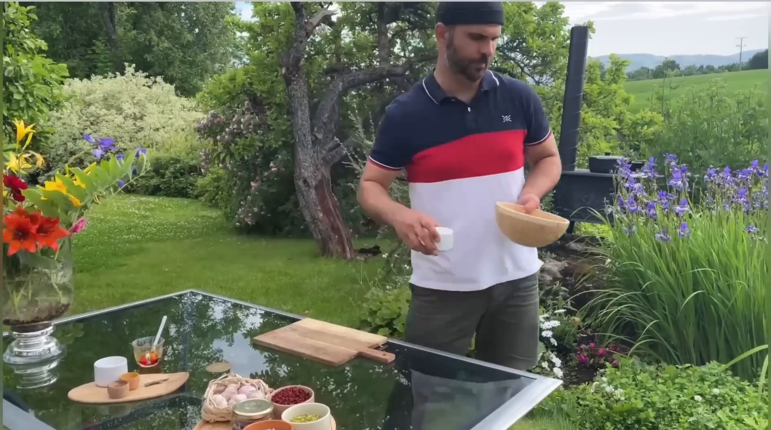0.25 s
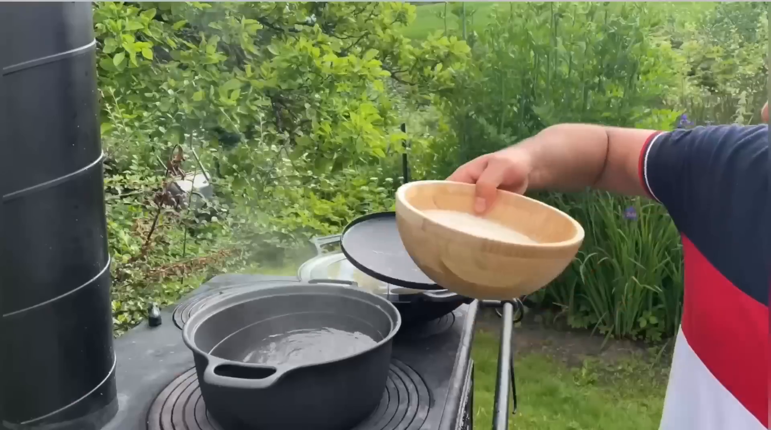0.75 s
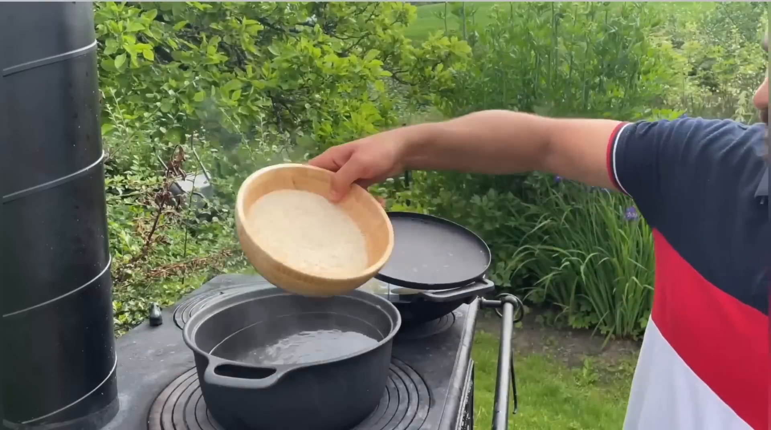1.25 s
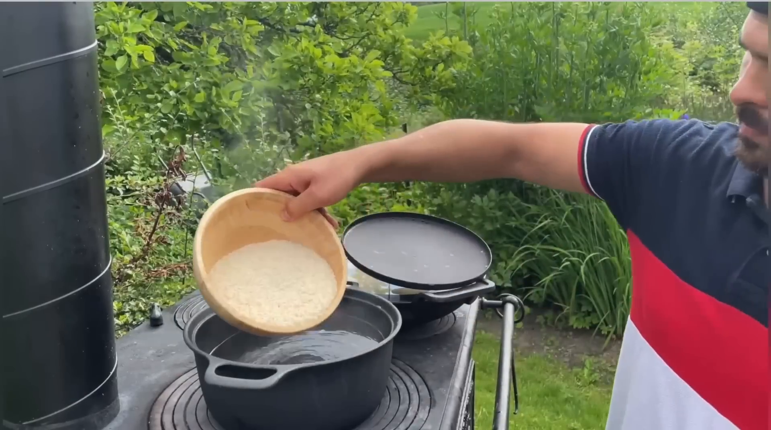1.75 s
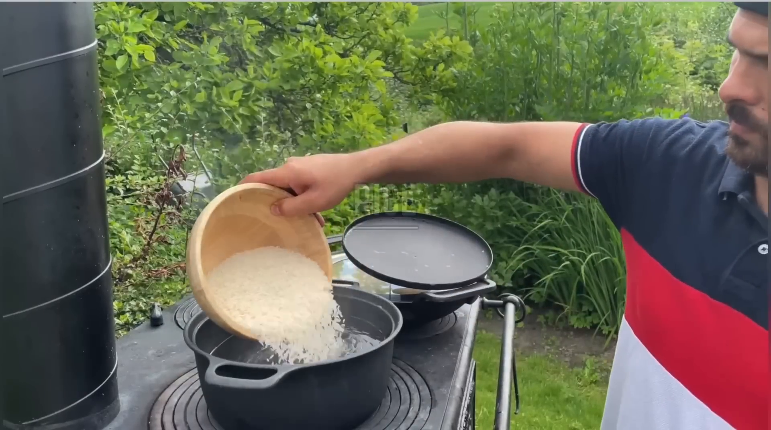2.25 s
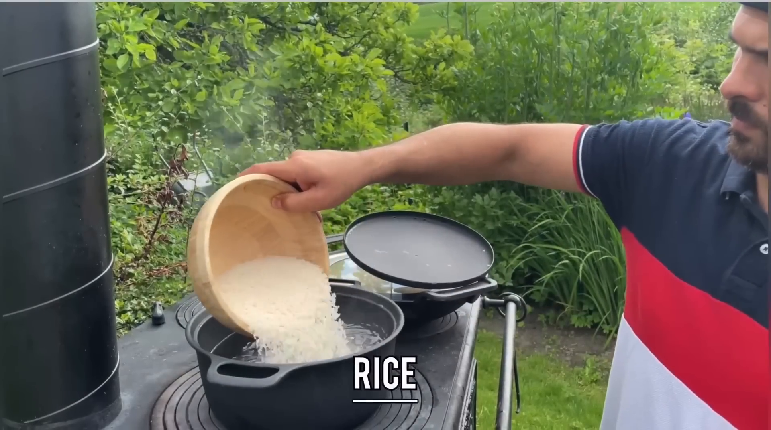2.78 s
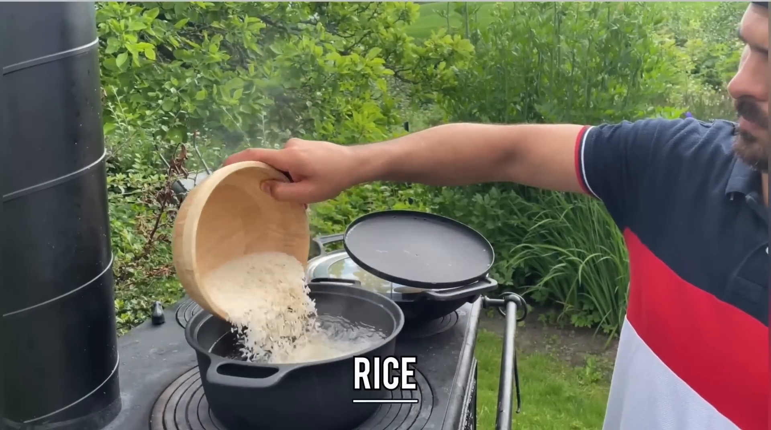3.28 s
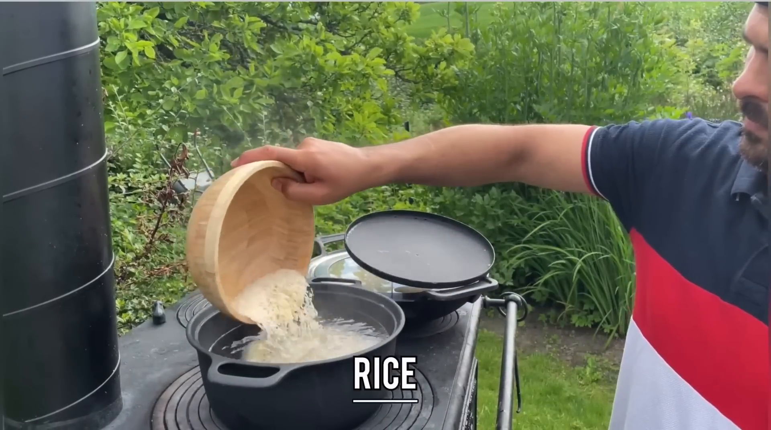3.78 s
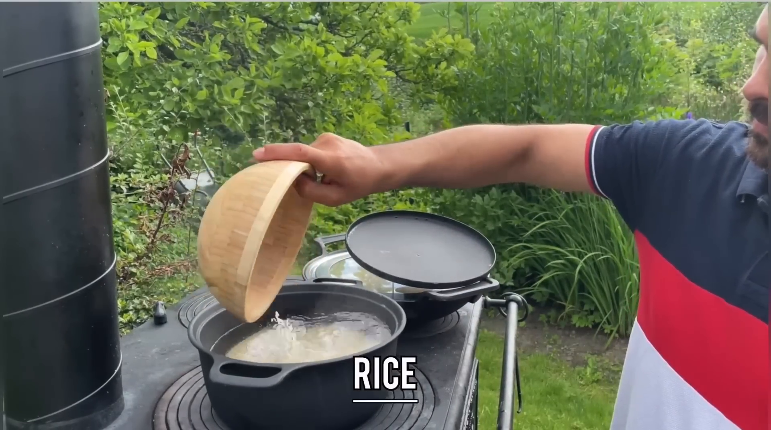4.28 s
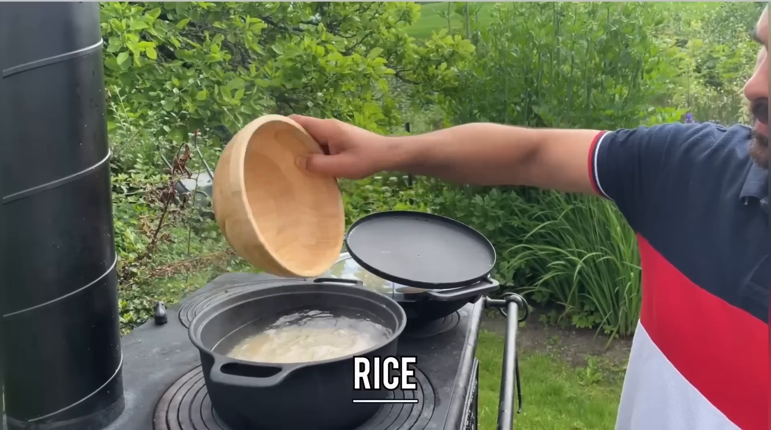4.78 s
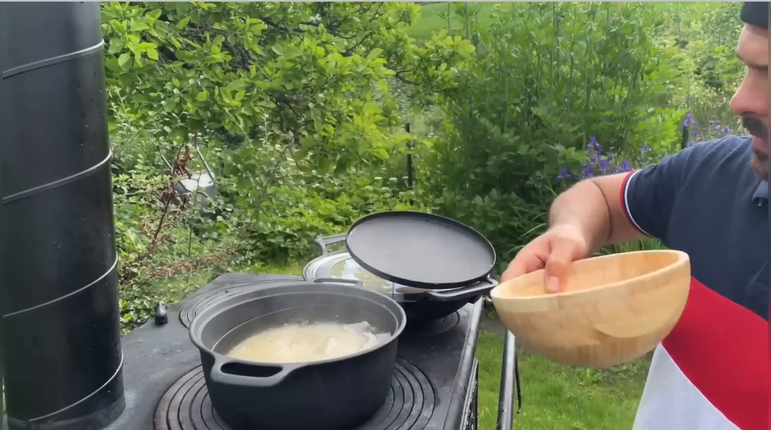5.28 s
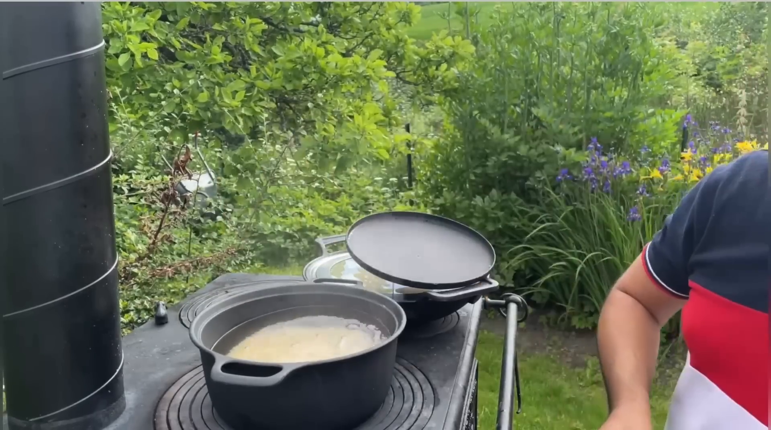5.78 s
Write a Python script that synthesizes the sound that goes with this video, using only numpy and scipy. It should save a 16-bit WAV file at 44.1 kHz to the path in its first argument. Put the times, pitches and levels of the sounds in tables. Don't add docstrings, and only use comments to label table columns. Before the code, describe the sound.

A quiet outdoor garden, stereo microphone, with a muted low hum of a distant road. For the first 0.6 seconds there is little else but a faint rustle near 0.3; then the place changes to a stove and the hum loses some hiss. Soft, deep wind thumps begin around 0.9 and recur, thickest from 3 to 5. At 1.35 a brief, clear slide of dry rice rasps down a wooden bowl. From 1.9 grains trickle, then stream into hot water: a dense crisp hiss of tiny woody clicks with bright fizz, slipping in pulses, thinning near 2.6 and 3.8, fullest about 3.5 and 4.0, stopping by 4.3. Faint fizz from the pot stays, with stray ticks at 4.55 to 5.3 and small rustles at 5.6. At 5.87 the empty bowl hits a table: a sudden, loud, hard wooden clack of near-simultaneous contacts, a small rebound and a very short tail.

```python
import sys
import numpy as np
from scipy import signal
from scipy.fft import rfft, irfft, next_fast_len
from scipy.io import wavfile
from scipy.ndimage import uniform_filter1d

SR = 44100
rng = np.random.default_rng(int(sys.argv[2]) if len(sys.argv) > 2 else 0)


def master_out(mix):
    frames = np.transpose(np.atleast_2d(mix))
    ceiling = np.clip(frames, -1, 1)
    pcm = np.round(ceiling * 32767).astype(np.int16)
    wavfile.write(sys.argv[1], SR, pcm)


def ratio_of_db(decibels):
    return 10 ** (np.asarray(decibels, float) / 20)


N = 266260
MOVE_S = .64

# t/s, flow/dB
POUR = [
    (1.885, -87),
    (1.909, -69.5),
    (2.352, -60),
    (2.61, -65),
    (2.8, -58),
    (3.55, -56),
    (3.8, -62),
    (4.03, -56),
    (4.33, -80),
]


def evened(x):
    return x / np.sqrt(np.mean(x ** 2) + 1e-20)


def read(points, hz, axis=1):
    table = np.transpose(points)
    return np.interp(np.log(hz + 1), np.log(table[0] + 1), table[axis])


def add(mix, s, sound):
    part = mix[..., round(s * SR):][..., :sound.shape[-1]]
    part += sound[..., :part.shape[-1]]


def ringing(x, spectrum):
    log_gain = np.log(ratio_of_db(read(spectrum, abs(np.fft.fftfreq(4096, 1 / SR)))))
    taps = np.fft.ifft(np.exp(np.conj(signal.hilbert(log_gain)))).real[:2048]
    return signal.oaconvolve(x, taps[None], axes=1)[:, :x.shape[1]]


def band(x, hz, width_hz):
    edges = np.clip([hz - width_hz / 2, hz + width_hz / 2], 20, SR / 2 - 500)
    return signal.sosfilt(signal.butter(2, edges, "bandpass", fs=SR, output="sos"), x)


def patchy(shape, bins, frames):
    field = rng.standard_normal(shape[::-1])
    field = uniform_filter1d(field, round(frames), 0)
    return evened(uniform_filter1d(field, round(bins), 1)).T


def flows():
    # start/s, length/s, peak level/dB
    slips = [(1.336, .2, -47), (1.89, 0.092, -59.5), (1.977, 0.12, -52), (2.106, 0.13, -55.5),
             (2.217, 0.082, -55.5), (2.613, .18, -52), (2.888, .135, -53), (3.07, 0.17, -56.5),
             (3.212, 0.12, -56), (3.319, 0.15, -52.5), (3.45, 0.16, -57.5), (3.683, 0.11, -55.5),
             (3.797, 0.16, -55), (3.951, 0.067, -56)]
    arch = 0.98
    slide_power = np.zeros(N)
    for start, length, peak_db in slips:
        swell = np.sin(np.pi * np.arange(0, length, 1 / SR) / length) ** (2 * arch)
        add(slide_power, start, ratio_of_db(2 * peak_db) * swell)
    s, flow_db = np.transpose(POUR)
    stream = ratio_of_db(np.interp(np.arange(N) / SR, s, flow_db, left=-120, right=-120))
    return stream, np.sqrt(slide_power)


def rice(size_spread_db=1.0, clump_db=0.26, offset_db=3.5, split_hz=6400):
    # f/Hz, density/dB per Hz
    grain_ring = [(1700, -7), (2350, -10.5), (2700, -1.5), (3500, 1.5), (3950, -2.5), (4400, -4),
                  (5100, 1.5), (5550, -5.5), (6200, -14.5), (6900, -11), (8000, -15.5), (9300, -9.5),
                  (10500, -13), (11800, -21)]
    grains_per_s, full_flow_db = 11000, -51.5
    stream_fizz_db, slide_fizz_db = 10.5, 7
    heap_shift_db = 1.4

    stream, slides = flows()
    flow = np.hypot(stream, slides)
    fizz = np.hypot(stream * ratio_of_db(stream_fizz_db), slides * ratio_of_db(slide_fizz_db))

    rate = grains_per_s * np.clip(flow / ratio_of_db(full_flow_db), .15, 1.5) / SR
    size = ratio_of_db(size_spread_db * np.minimum(rng.exponential(1, (2, N)), 5))
    size = size * rng.choice([-1, 1], (2, N))
    clumps = ratio_of_db(clump_db * evened(uniform_filter1d(rng.standard_normal(N), 300)))
    landed = rng.random((2, N)) < rate
    rung = ringing(size * landed / np.sqrt(rate) * clumps, grain_ring)

    z = signal.stft(rung, nperseg=512)[2]
    wander = ratio_of_db(heap_shift_db * patchy(z.shape[1:], 3, 14))
    rung = signal.istft(z * wander, nperseg=512)[1][:, :N]
    rung = rung / np.std(band(rung, 4650, 4300))

    low = signal.oaconvolve(rung, signal.firwin(101, split_hz, fs=SR)[None], "same")
    return ratio_of_db(offset_db) * (low * flow + (rung - low) * fizz)


def knock(ring_db=-7, crack_db=-8, tail_db=-29, tail_t60=0.12):
    # t/s, left level/dB, right level/dB, tilt/dB per octave
    contacts = [
        (5.8725, -36, -33, -2),
        (5.8744, -16, -19, 1),
        (5.8760, -16, -15, -2),
        (5.8852, -29, -27, -3),
        (5.892, -33, -30, -4),
    ]
    # f/Hz, left level/dB, right level/dB, t60/s
    modes = [(244, -22, -24, 0.041), (553, -8, -19, 0.029), (1156, -7, 0.5, 0.023), (1845, -5, 2, 0.017),
             (2360, -3.5, -8, 0.021), (2820, 1, -3, 0.021), (3020, 2.5, -14, 0.019),
             (3720, 10.5, 2, 0.0083), (4270, -1, -18, 0.012), (4818, -15, -21, 0.01),
             (6400, -2.5, -28, 0.01)]
    # f/Hz, level/dB
    crack_colour = [(200, -12.5), (600, -4), (1100, -9), (2000, -0.5), (3500, -2), (5000, -1), (6500, -12),
                    (7500, -13), (9000, -62)]

    out, u = np.zeros((2, N)), np.arange(6000) / SR
    decay = ratio_of_db(crack_db - 60 * u / .012) + ratio_of_db(tail_db - 60 * u / tail_t60)
    attack = np.minimum(u / 0.00031, 1)
    for s, left_db, right_db, tilt_db in contacts:
        ring = np.zeros((2, 6000))
        for hz, *sides_db, t60 in modes:
            level_db = np.array(sides_db)[:, None] + tilt_db * np.log2(hz / 2000)
            cycles = hz * u + rng.random() + 0.1 * rng.random((2, 1))
            ring += ratio_of_db(level_db - 60 * u / t60) * np.sin(2 * np.pi * cycles)
        tilted = [(hz, db + tilt_db * np.log2(hz / 2000)) for hz, db in crack_colour]
        left, other = evened(ringing(rng.standard_normal((2, 6000)), tilted)) * decay
        crack = np.array([left, 0.55 * left + 0.9 * other])
        sides = ratio_of_db(np.array([[left_db], [right_db]]))
        add(out, s, sides * (ratio_of_db(ring_db) * ring + crack) * attack)
    return out


def strays():
    # t/s, level/dB, f/Hz, width/Hz, length/s
    bursts = [(.29, -56, 8900, 2880, 0.03), (4.551, -56, 9700, 4660, .005), (4.612, -95, 8550, 900, .014),
              (4.688, -58, 4000, 5000, .005), (4.691, -67.5, 5000, 5030, 0.058),
              (4.917, -62, 6000, 6940, .005), (4.932, -73, 4500, 4030, .05),
              (5.197, -69.5, 5470, 4000, .01), (5.28, -65, 3640, 2500, 0.048),
              (5.63, -69, 8800, 1100, .035), (5.623, -74, 6250, 800, 0.037),
              (5.633, -65.5, 4640, 1000, 0.029), (5.852, -65, 4800, 2600, 0.025),
              (5.874, -43.5, 8500, 4600, 0.0044), (5.998, -63, 3000, 3500, 0.0064),
              (5.998, -66.5, 3200, 3500, 0.043)]
    out, u = np.zeros((2, N)), np.arange(4000) / SR
    for s, level_db, hz, width_hz, length in bursts:
        shape = (u / length) ** .5 * np.exp(-(u / length) ** 2 * 2) * 2
        noise = evened(band(rng.standard_normal((2, 4000)), hz, width_hz))
        add(out, s, ratio_of_db(level_db) * noise * shape)
    return out


def wind():
    # t/s, peak level/dB, length/s
    slaps = [(0.105, -35, 0.01), (0.939, -31, 0.011), (0.98, -37, 0.044), (1.026, -28.5, 0.022),
             (1.165, -35, 0.0059), (1.376, -34.5, 0.029), (1.472, -35, 0.011), (1.608, -36, 0.029),
             (2.887, -41, 0.024), (3.074, -30.5, 0.0038), (3.136, -29.5, 0.01), (3.43, -29, 0.013),
             (3.501, -32.5, 0.057), (3.595, -31, 0.05), (3.655, -27, 0.045), (3.74, -44, 0.015),
             (3.841, -26.5, 0.024), (3.907, -30, 0.0037), (3.941, -26, 0.045), (4.027, -23, 0.0092),
             (4.186, -27, 0.026), (4.304, -35.5, 0.026), (4.423, -32.5, 0.0071), (4.714, -36, 0.024),
             (4.916, -22.5, 0.022), (4.949, -30.5, 0.012), (5.088, -39, 0.016), (5.125, -37.5, 0.03),
             (5.644, -44, 0.05)]
    # t/s, level/dB
    rumble = [(0.0, -52.5), (0.8, -52), (1.3, -47), (1.8, -45.5), (2.0, -52.5), (3.11, -43.5), (3.43, -48),
              (3.8, -37), (4.389, -47.5), (5.08, -46.5), (6.04, -48)]
    rumble_hz, rumble_width_hz = 67, 46.7
    slap_hz, drop_hz_per_s, spread_hz = 80.3, 390, 3.4

    s, level_db = np.transpose(rumble)
    lumps = ratio_of_db(1.6 * evened(uniform_filter1d(rng.standard_normal(N), 1500)))
    out = evened(band(rng.standard_normal((2, N)) * lumps, rumble_hz, rumble_width_hz))
    out = out * ratio_of_db(np.interp(np.arange(N) / SR, s, level_db))

    u = np.arange(-.06, .06, 1 / SR)
    for s, peak_db, length in slaps:
        turn, odd = rng.random(2)
        hz = slap_hz - drop_hz_per_s * length + spread_hz * (2 * odd - 1)
        shape = np.exp(-np.where(u < 0, 5.5, 1.6) * (u / length) ** 2)
        port_turn = np.array([[0], [0.26 * odd - .15]])
        cycles = hz * u * (1 - 7 * u) + turn + port_turn
        add(out, s - .06, ratio_of_db(peak_db) * shape * np.cos(2 * np.pi * cycles))
    return out


def yard(patchy_db=1.0):
    # f/Hz, density/dB per Hz
    stove_hum = [(130, -70.5), (250, -76.5), (450, -73), (700, -68.5), (950, -70), (1300, -76.5),
                 (1700, -87.5), (2400, -97), (3300, -106), (5250, -112), (5600, -117), (8000, -119),
                 (11000, -120), (12200, -130)]
    # f/Hz, density/dB per Hz
    table_hum = [(130, -68), (250, -75.5), (450, -67.5), (650, -71), (950, -67.5), (1300, -74.5),
                 (1800, -87), (2500, -95.5), (3700, -100), (5200, -99), (5600, -106), (7800, -103),
                 (11000, -108), (12200, -123)]
    pot_fizz_db, rice_in_fizz_db = 3.5, 8.5

    frames, hz = N // 256 + 5, np.fft.rfftfreq(1024, 1 / SR)
    t = np.arange(frames) * 256 / SR
    re, im = rng.standard_normal((2, 513, frames, 2)).transpose(0, 3, 1, 2)
    patches = patchy((513, frames), 8, 14)
    colour_db = np.where(t < MOVE_S, read(table_hum, hz)[:, None], read(stove_hum, hz)[:, None])
    fizz_db = np.interp(t, [MOVE_S, POUR[-1][0]], [pot_fizz_db, rice_in_fizz_db])
    colour_db += fizz_db * np.clip(hz / 6000 - .3, 0, 1)[:, None]
    z = (re + 1j * im) * ratio_of_db(colour_db + patchy_db * patches) * np.sqrt(SR / 1024 * 3 / 4)
    return signal.istft(z, nperseg=1024, noverlap=768)[1][:, :N]


def ports(x, low_likeness):
    # f/Hz, phase of right against left/rad, likeness/0-1, left-right level/dB
    pair = [(90, 0, .93, 0), (430, -1.5, .76, 2), (700, -2.4, .84, 5), (1460, -3.14, .9, 1),
            (1680, -4.7, .4, 2), (2200, -6.3, .9, 1), (3400, -8.7, .35, 6), (3850, -10.8, .1, 8),
            (4250, -12.6, .6, 5), (5250, -12.6, .7, 6), (6000, -12.5, .7, 0), (7650, -9.42, .95, 0),
            (9500, -9.42, .95, 0), (11800, -7, .5, 0)]
    size = next_fast_len(N)
    hz, (a, b) = np.fft.rfftfreq(size, 1 / SR), rfft(x, size)
    same = np.clip(read(pair, hz, axis=2) * np.where(hz < 2000, low_likeness, 1), 0, 1)
    right = same * a + np.sqrt(1 - same ** 2) * b
    right = right * np.exp(1j * read(pair, hz)) / ratio_of_db(read(pair, hz, axis=3))
    return irfft(np.array([a, right]), size)[:, :N]


def scene():
    far = rice() + strays() + yard()
    early = np.arange(N) / SR < MOVE_S
    gusts = wind()
    buffeting = gusts[0] + .45 * (gusts - gusts[0])
    return ports(far * early, 0.61) + ports(far * ~early, 0.89) + buffeting + knock()


def low_pass(x):
    return signal.sosfilt(signal.butter(12, 12790, fs=SR, output="sos"), x)


def record(dry):
    cut = signal.sosfilt(signal.butter(2, 34, "highpass", fs=SR, output="sos"), dry)
    return low_pass(cut)


dry = scene()
out = record(dry)
master_out(out)
```